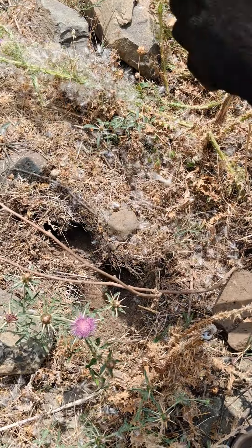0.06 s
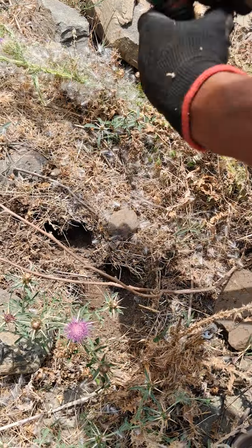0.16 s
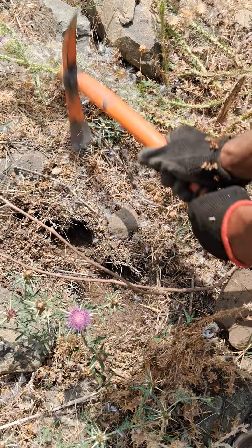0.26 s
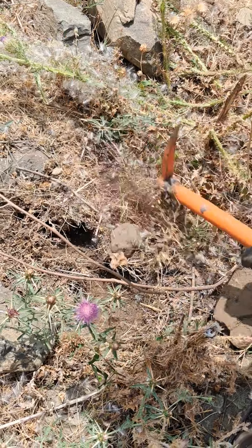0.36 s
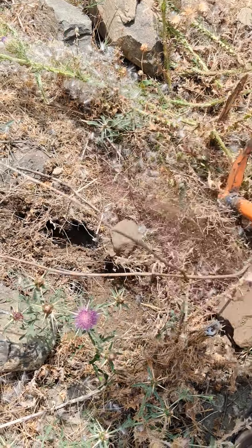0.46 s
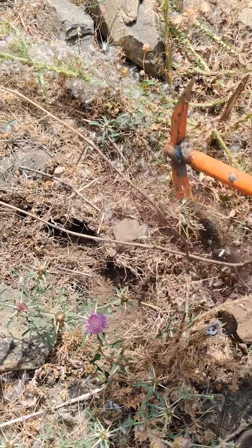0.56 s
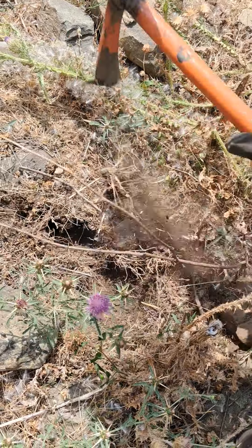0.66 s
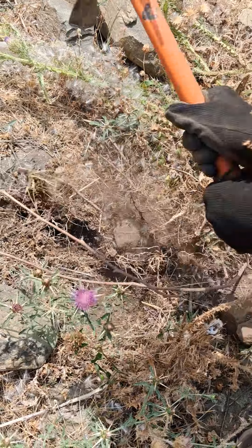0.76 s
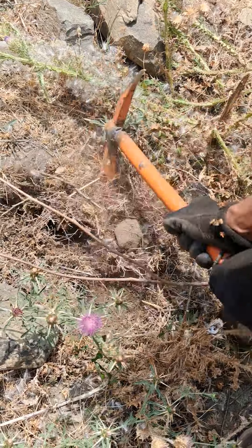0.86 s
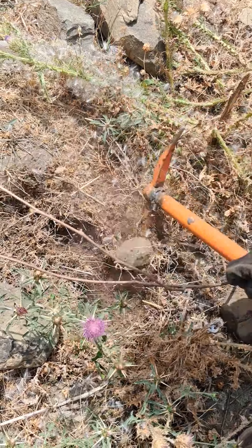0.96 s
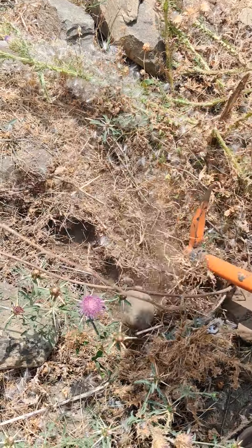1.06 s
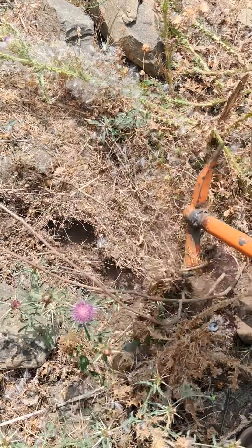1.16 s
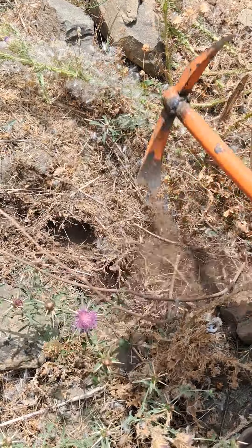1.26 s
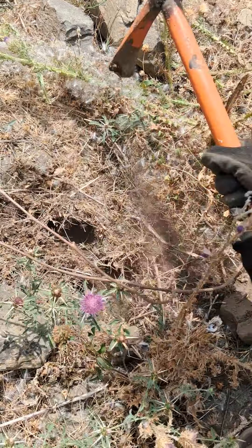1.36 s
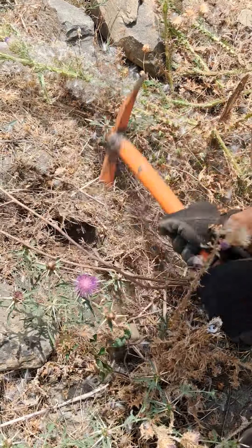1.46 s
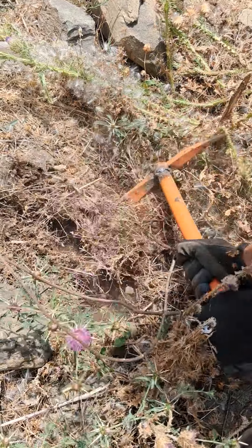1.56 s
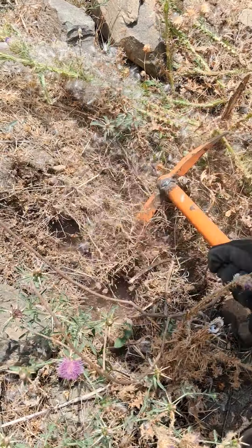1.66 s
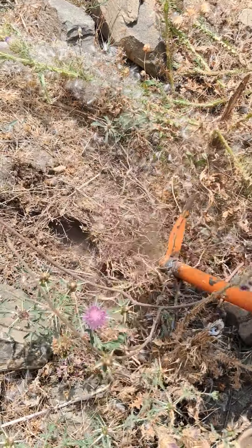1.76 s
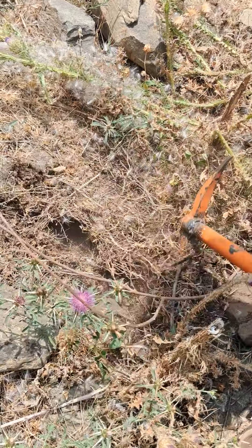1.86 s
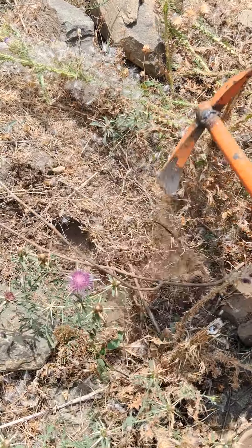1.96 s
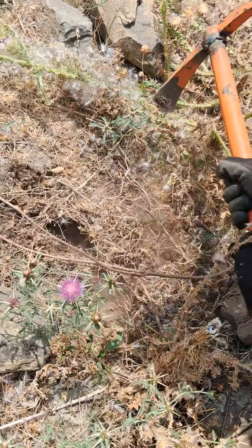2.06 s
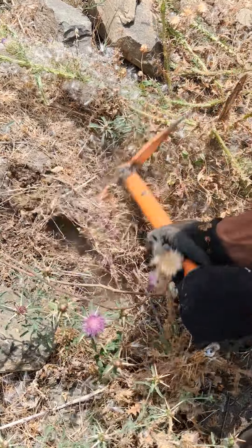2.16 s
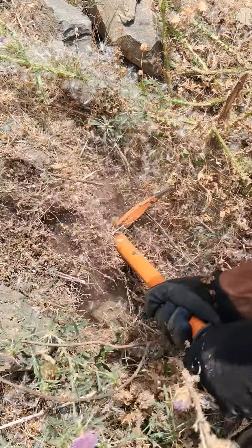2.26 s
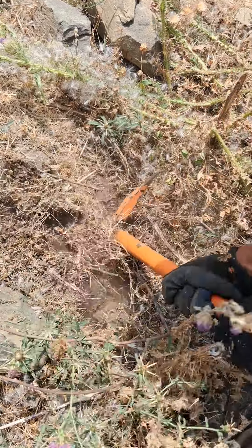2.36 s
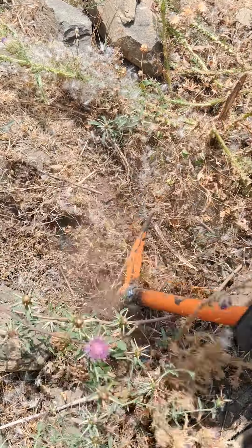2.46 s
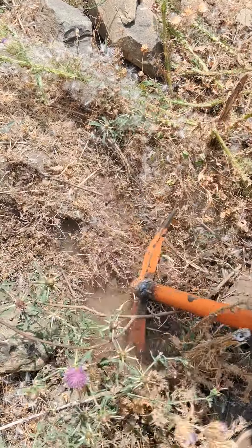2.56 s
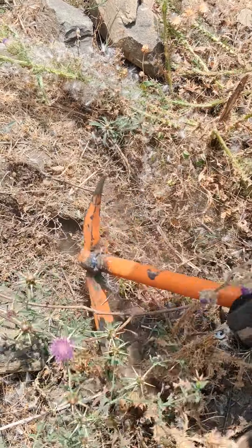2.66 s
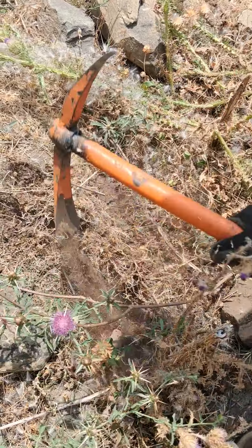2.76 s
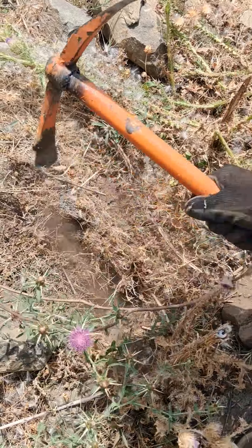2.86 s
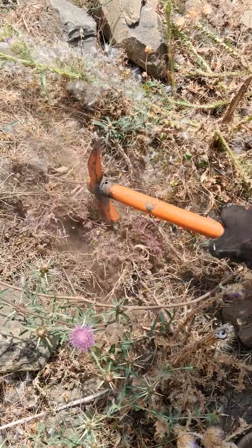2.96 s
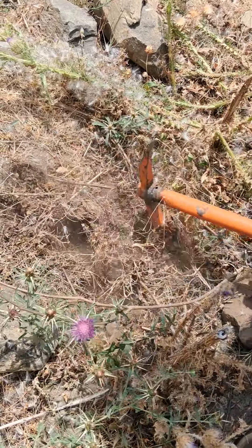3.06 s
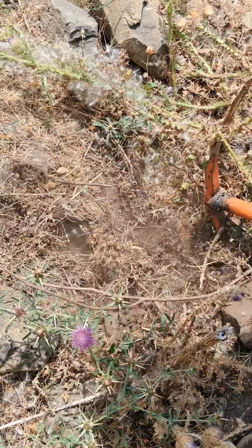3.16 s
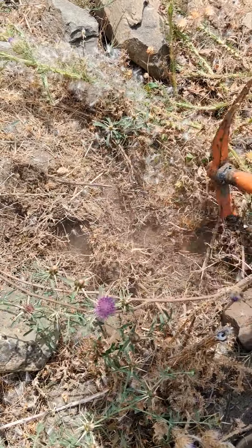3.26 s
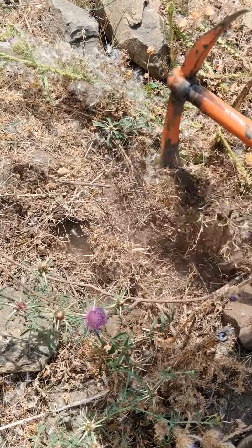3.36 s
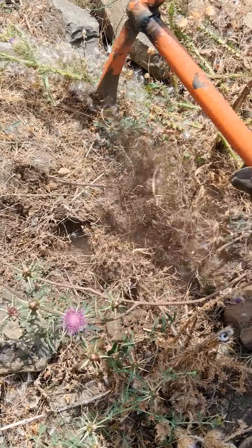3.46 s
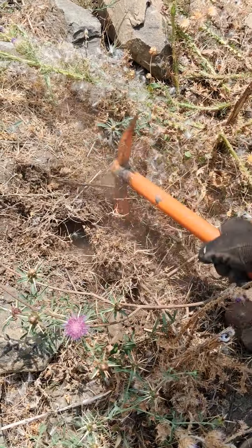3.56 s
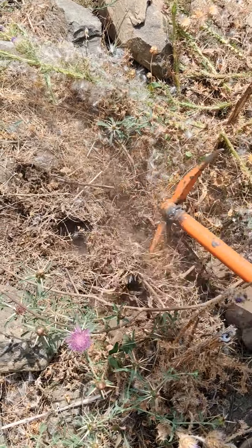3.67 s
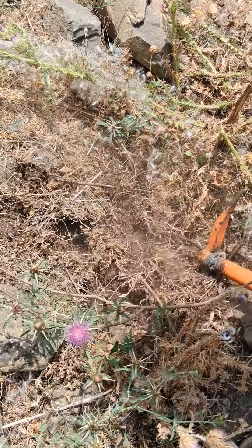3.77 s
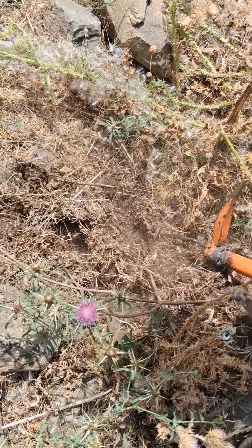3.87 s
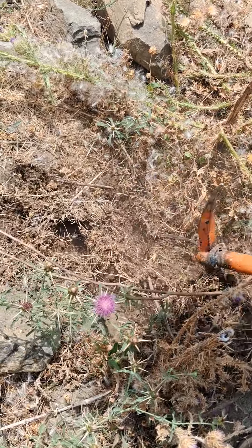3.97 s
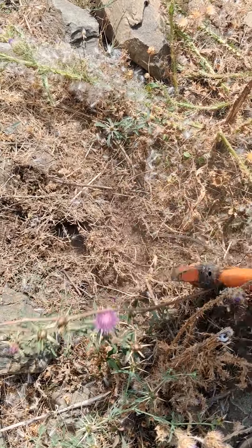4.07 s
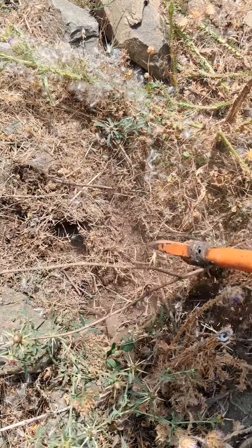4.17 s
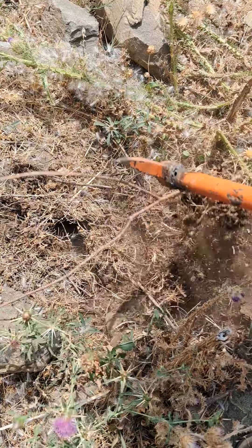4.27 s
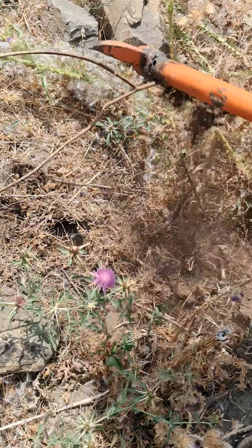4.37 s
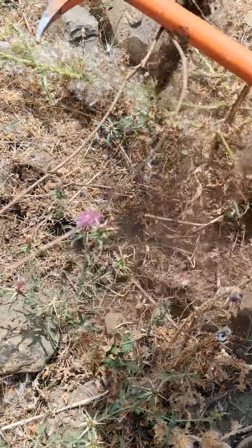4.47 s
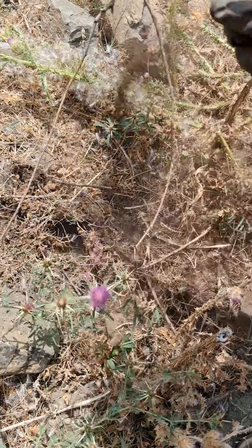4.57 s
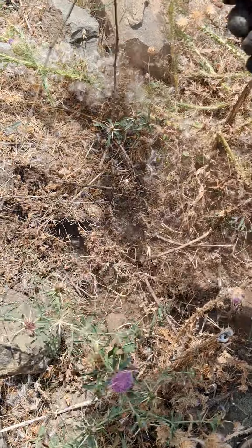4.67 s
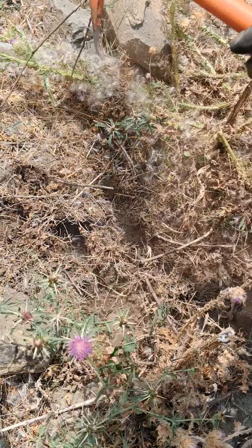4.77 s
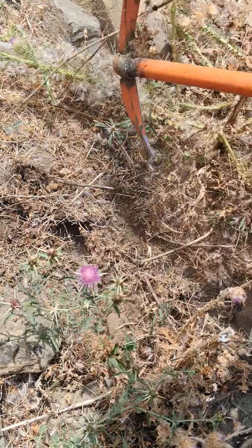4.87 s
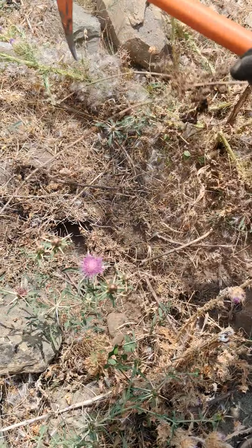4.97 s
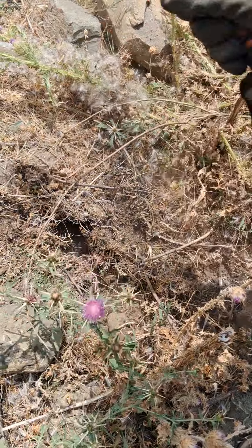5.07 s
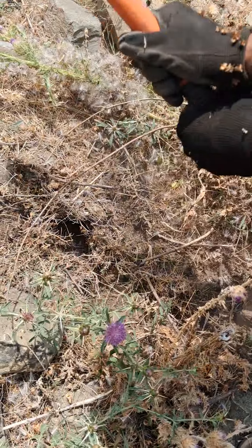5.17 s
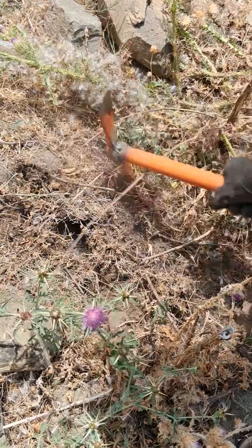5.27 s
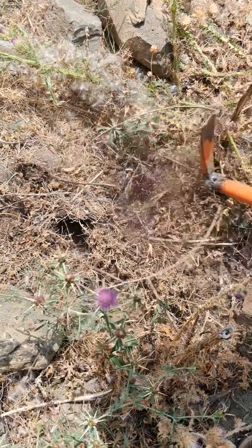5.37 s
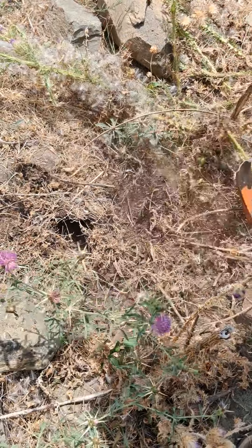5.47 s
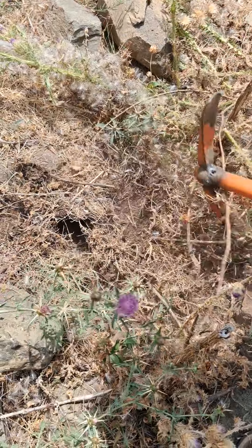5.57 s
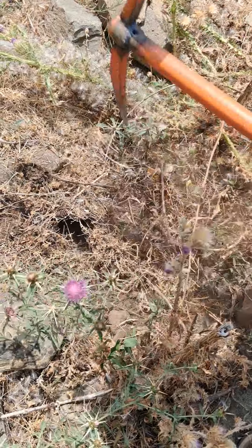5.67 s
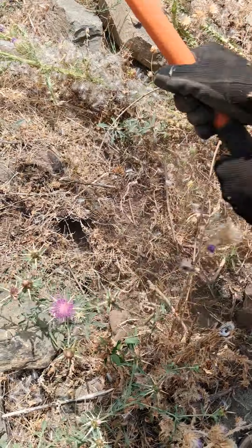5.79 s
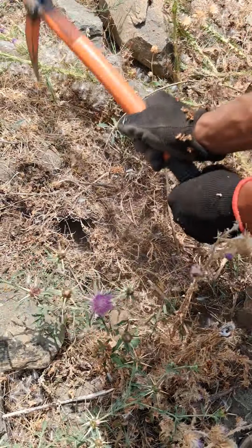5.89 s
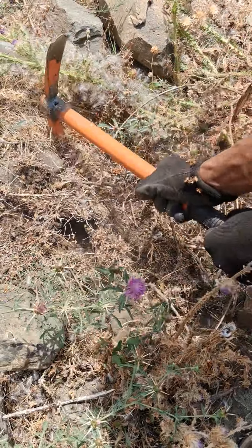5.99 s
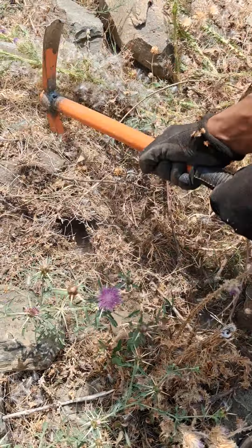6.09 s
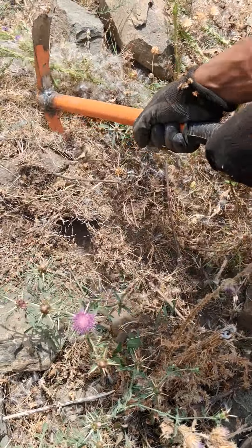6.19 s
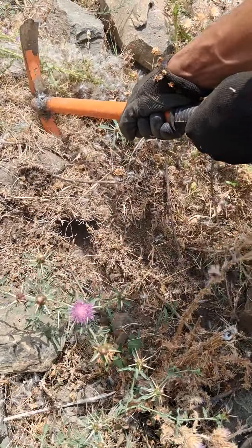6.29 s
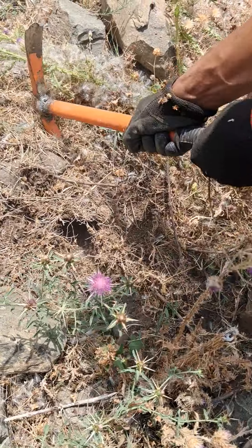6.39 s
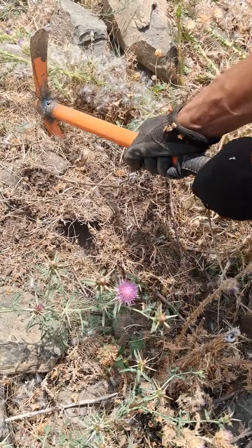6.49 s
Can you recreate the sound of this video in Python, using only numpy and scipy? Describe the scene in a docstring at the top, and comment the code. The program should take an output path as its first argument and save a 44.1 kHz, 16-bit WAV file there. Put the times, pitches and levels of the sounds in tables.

```python
"""A small pick-mattock chops eight times into dry stony soil, outdoors, close to a hand-held microphone.
Each blow is a run of tiny grit fractures ringing the struck stone, plus a low thump of the ground.
Stones, clods, stems on steel and dull handling taps knock briefly; scraped steel rings as fading sine waves.
Dry weeds snap and rustle, thrown soil patters down and grit hisses, all built from random grains.
Shaped noise and wobbling low tones make the air that buffets the microphone."""
import sys
import numpy as np
from scipy import signal
from scipy.fft import rfft, irfft
from scipy.io import wavfile

SR = 44100
rng = np.random.default_rng(int(sys.argv[2]) if len(sys.argv) > 2 else 0)


def waveform_to_disk(signal):
    """Save audio, clipped to [-1, 1], as 16-bit WAV at the path in sys.argv[1]."""
    frames = np.transpose(np.atleast_2d(signal))
    scaled = np.clip(frames, -1, 1) * 32767
    samples = np.round(scaled).astype(np.int16)
    wavfile.write(sys.argv[1], SR, samples)


N = 288049  # length of the scene in samples

# Blows of the blade. Columns: start_s, bite_s (time in the soil), left_minus_right_db (halved in use),
# four resonances of the struck stone and soil: ring1_hz, ring2_hz, ring3_hz, ring4_hz,
# body_db, knock_db, crunch_db, grit_db, fizz_db, steel_ring_db (lifted in use), thump_db, thump_hz
BLOWS = [(0.345, 0.0061, -4, 509, 1220, 2100, 3670, -26.5, -27, -13.5, -20, -20.5, -57.5, -16, 121.4),
         (0.9073, 0.0058, -2.5, 568, 1096, 2060, 2680, -28.5, -26.5, -20, -27, -26.5, -41.5, -17, 122),
         (1.53, 0.0045, -3, 539, 1190, 2210, 5100, -21.5, -15, -18.5, -19, -25, -72, -15, 190),
         (2.224, 0.0043, -2, 560, 1190, 1710, 3850, -24.5, -22, -18, -20.5, -15, -38.5, -25.5, 161.7),
         (3.0064, 0.0066, 0, 257, 1170, 2780, 3040, -30, -39.5, -29, -33.5, -29.5, -45.5, -18.5, 112.3),
         (3.6438, 0.00268, -0.5, 266.4, 1057, 2410, 4640, -28.5, -23, -15, -22, -22.5, -30, -16.5, 124),
         (5.318, 0.0073, -1, 456.5, 1374, 1920, 2860, -24.5, -19.5, -21.5, -23, -20, -42, -17, 115.7),
         (5.9923, 0.0045, -1, 274, 333, 2860, 2840, -26, -38, -24.5, -32.5, -29, -51, -29.5, 105)]
STONE_RING, STONE_SHARPNESS = 3.2, 17  # how strongly and how sharply the struck stone rings (plain numbers)


def strikes():
    """The blade brushes the weeds, crushes grit until it stops, and the ground rebounds with a thump."""
    out = np.zeros((2, N))
    lead_s = .01  # the brush through the weeds begins before contact
    t = np.arange(SR // 6) / SR - lead_s
    since = np.maximum(t, 0)
    for s, bite_s, balance_db, *colour, ring_db, thump_db, thump_hz in BLOWS:
        rings, band_db = colour[:4], colour[4:]
        crush = np.exp(-(since / (1.7 * bite_s)) ** 3) + .16 * np.exp(-since / .012)
        onset = 1 - .7 * np.exp(-since / .0007)
        entry = .11 * np.exp(-abs(t) / .0035)
        force = np.where(t > 0, crush * onset, entry)
        blow = crunch(force, balance_db / 2, band_db, per_s=9000, spread_db=4, push=.3,
                      rings=rings, ring_gain=STONE_RING, sharpness=STONE_SHARPNESS)
        add(out, s - lead_s, blow)
        add(out, s, amp(ring_db + 4.5) * steel())

        swell = since / 0.004
        rebound = swell * np.exp(1 - swell) + 0.13 * np.exp(-since / 0.033)
        phase = 2 * np.pi * thump_hz * since
        overtone = 0.36 * rebound * np.sin(2 * phase)  # packed soil stiffens, adding an overtone
        thump = rebound * (np.sin(phase) + overtone)
        add(out, s - lead_s + .005, amp(thump_db) * thump)
    return out


# Ways the steel head vibrates. Columns: pitch_hz, level_db, fade_s (time to fall 60 dB)
STEEL_MODES = [(1107, 0, .13), (1739, -15, .08), (2207, -12, .06), (2546, -3, .035), (2905, -3, .05),
               (3490, -18, .04), (4452, -27, .08), (8247, -30, .05)]


def steel():
    """The head's ring after one tap; the point of contact shifts the weight of each mode."""
    t = np.arange(SR // 4) / SR
    ring = np.zeros(len(t))
    for hz, db, fade_s in STEEL_MODES:
        fading = amp(db + rng.normal(0, 1.7) - 60 * t / fade_s)
        ring += fading * np.sin(2 * np.pi * hz * t)
    return burst_unit(ring)


# Limits of the body, knock, crunch, grit and fizz bands. Column: edge_hz
BAND_LIMITS = [175, 700, 1500, 3200, 7500, 16000]


def crunch(force, balance_db, band_db, per_s, spread_db, push=0.13, rings=(), ring_gain=1, sharpness=8):
    """A first push and a run of fractures under a force pulse ring what they hit.

    band_db sets the levels of the topmost bands; balance_db is left minus right.
    """
    x = burst_unit(pair(grains(len(force), per_s, spread_db)) * force)
    x[:, np.argmax(force)] += push * np.sqrt(SR / 100)
    x = x + ring_gain * sum(resonate(x, hz, 60 + hz / sharpness) for hz in rings)
    bands = list(zip(BAND_LIMITS, BAND_LIMITS[1:]))[-len(band_db):]
    out = np.zeros_like(x)
    for band, db in zip(bands, band_db):
        band_filter = signal.butter(N=4, Wn=band, btype="band", fs=SR, output="sos")
        out += amp(db) * burst_unit(signal.sosfilt(band_filter, x))
    return out * amp([[balance_db / 2], [-balance_db / 2]])


# Short knocks: stones, clods, stems breaking against the steel, and dull handling taps near the microphone.
# Columns: start_s, length_s, resonance_hz, left_minus_right_db (halved in use),
# level_db (in the band of the resonance), bass_step_db (per band below), treble_step_db (per band above),
# steel_ring_db (lifted in use)
SHORT_KNOCKS = [(0.027, 0.00057, 1390, 8, -27.5, -11, -14.5, -62),
                (0.047, 0.00068, 1290, 4, -45, 6.5, -13, -62),
                (0.085, 0.00045, 1180, 5, -45, -2.5, -12, -60),
                (0.178, 0.0068, 1130, 9.5, -42, -3, -17, -59.5), (0.4382, 0.004, 2120, 0, -34, -5, -9, -68),
                (0.51, 0.0058, 2260, -6.5, -40.5, -8.5, -1.5, -69),
                (1.0289, 0.005, 1990, 1, -25.5, 1, -7, -30.5),
                (1.0784, 0.0081, 3900, -1, -29, -7.5, -9, -68),
                (1.6587, 0.0013, 1880, 0.5, -40.5, -13.5, -4, -66),
                (1.718, 0.0043, 1770, 2, -36.5, -8.5, -5, -68),
                (1.771, 0.0026, 2130, 4.5, -37.5, -4.5, -9, -54.5),
                (1.783, 0.0089, 1820, -7, -38.5, -4, -0.5, -58.5),
                (2.406, 0.004, 2304, -4.5, -42.5, -3, -11, -60),
                (2.443, 0.0049, 2500, -5, -36, -2, -16, -40.5),
                (2.527, 0.0089, 1830, -10, -38.5, -3, -12, -50),
                (2.6777, 0.0038, 1810, -3, -46, 3.5, 2, -60), (3.0335, 0.0032, 1030, -7, -36.5, 2, -2, -63),
                (3.0793, 0.0025, 1990, -2, -37.5, -5.5, -3, -64),
                (3.157, 0.0036, 2100, 0, -32.5, -6.5, -4.5, -56),
                (3.165, 0.0038, 2070, -3, -19.5, -14, -10.5, -44),
                (3.7004, 0.0039, 1140, -3.5, -27, -1.5, -6, -39.5),
                (3.743, 0.0038, 2260, 1, -24.5, -20, -3.5, -60),
                (3.7605, 0.0075, 3480, -6, -32.5, 1, -16, -33.5),
                (3.831, 0.0014, 2550, -2, -43, -5.5, -1, -63),
                (3.9904, 0.011, 1680, 1, -36.5, -9, -18, -55),
                (4.0098, 0.003, 1670, -5, -28, -16, -13, -36.5),
                (4.055, 0.0017, 2570, -11, -36, -11.5, -15, -62),
                (4.0775, 0.0039, 2960, -10, -34, -16, -9, -30.5),
                (5.3447, 0.0024, 2850, -7, -35, -2, -5.5, -44.5),
                (5.366, 0.006, 2880, -4, -29, -4.5, -4, -59),
                (5.4114, 0.0026, 1760, -3, -48.5, 4.5, -12, -63)]
KNOCK_RING, KNOCK_SHARPNESS = 5, 19  # how strongly and how sharply a knock rings (plain numbers)
THUD_DB, THUD_HZ, THUD_S = -12, 114, 0.013  # thud: level against the body band, pitch, swell's time to peak


def knocks():
    """Short contacts of stone, stem or hand ring what they touch; more body brings more of a low thud."""
    out = np.zeros((2, N))
    t = np.arange(SR // 10) / SR
    thud = t / THUD_S * np.exp(1 - t / THUD_S) * np.sin(2 * np.pi * THUD_HZ * t)
    for s, length_s, hz, balance_db, db, bass_db, treble_db, ring_db in SHORT_KNOCKS:
        steps = np.arange(len(BAND_LIMITS) - 1) - np.searchsorted(BAND_LIMITS[1:], hz)  # bands from resonance
        band_db = db + abs(steps) * np.where(steps < 0, bass_db, treble_db)
        force = np.exp(-t / (1.2 * length_s)) + .04 * np.exp(-t / .014)
        knock = crunch(force, balance_db / 2, band_db, per_s=8000, spread_db=1.5, push=0.23,
                       rings=[hz], ring_gain=KNOCK_RING, sharpness=KNOCK_SHARPNESS)
        add(out, s, knock)
        add(out, s, amp(ring_db + 1) * steel())
        add(out, s, amp(band_db[0] + THUD_DB) * thud)
    return out


# The blade dragged over stone. Columns: start_s, end_s, level_db, brightness_db (per octave),
# steel_ring_db (lowered in use)
STONE_SCRAPES = [(2.387, 2.445, -47.5, -4, -52.5), (3.707, 3.766, -25.5, -2, -56),
                 (3.767, 3.812, -35, -2.5, -55), (3.99, 4.096, -38.5, -0.5, -39),
                 (5.341, 5.379, -26.5, -2, -50)]
# Tone of the scraping. Columns: pitch_hz, level_db
SCRAPE_TONE = [(88, -47.5), (150, -6.5), (457, -10.5), (545, -29.5), (675, 6.5), (923, -6), (1100, -8.5),
               (1290, -0.5), (2180, 3.5), (6390, -1), (7770, -10), (11700, -2.5), (16000, -39)]


def scrapes():
    """The steel sticks and slips over stone; every slip sheds grit and taps the head."""
    out = np.zeros((2, N))
    t = np.arange(SR // 50) / SR
    for start, end, db, tilt_db, ring_db in STONE_SCRAPES:
        count = round(max(end - start, .02) * SR)
        sticking = abs(grains(count, per_s=420, spread_db=3)[0])
        slips = signal.fftconvolve(sticking, np.exp(-t / 0.0021))[:count]
        stroke = signal.windows.tukey(count, .5)
        grit = grains(count, per_s=9000, spread_db=2.5) * (.35 + unit(slips))
        rub = pair(grit, SCRAPE_TONE, tilt_db) * stroke
        add(out, start, amp(db) * rub)
        ring = unit(signal.fftconvolve(rub, steel()[None], axes=1))
        add(out, start, amp(ring_db - 3) * ring)
    return out


# Dry stems breaking. Columns: start_s, length_s, left_minus_right_db (quartered in use), fizz_db,
# bass_step_db (per band below the fizz)
STEM_SNAPS = [(0.218, 0.0094, 4, -41, -6.5), (0.544, 0.0038, -3, -38, -17), (0.906, 0.0047, 3, -54.5, 12.5),
              (1.204, 0.0052, -21, -35, -30), (2.5252, 0.0046, -19, -21.5, -7),
              (2.553, 0.00086, -12, -21.5, -15), (2.676, 0.00091, -22, -24, -6.5),
              (2.986, 0.012, -13, -42.5, -4), (4.113, 0.0013, -7, -36.5, -7),
              (4.2947, 0.0012, -10, -43.5, -24), (4.6875, 0.011, -11, -45.5, -5.5),
              (5.3096, 0.0092, -6, -31.5, -11), (5.415, 0.001, -16, -28, -32),
              (5.482, 0.0028, -20, -31, -8.5), (6.267, 0.0044, -2, -52.5, -5.5),
              (6.465, 0.0043, 9.5, -54, -17.5)]


def snaps():
    """Brittle stems give way in a quick run of bright cracks."""
    out = np.zeros((2, N))
    t = np.arange(SR // 20) / SR
    for s, length_s, balance_db, db, bass_db in STEM_SNAPS:
        decay = np.exp(-t / length_s) + .025 * np.exp(-t / .008)
        force = (1 - np.exp(-t / .0006)) * decay
        band_db = [db + 2 * bass_db, db + bass_db, db]  # crunch, grit, fizz
        add(out, s, crunch(force, balance_db / 4, band_db, per_s=11000, spread_db=0.5))
    return out


# Showers of thrown soil landing. Columns: middle_s, half_length_s, level_db
SOIL_SHOWERS = [(0.45, 0.054, -43), (0.602, 0.011, -51), (1.035, 0.081, -40), (1.235, 0.022, -57),
                (1.72, 0.15, -48.5), (1.939, 0.018, -54), (2.25, 0.063, -45.5), (3.159, 0.082, -43.5),
                (3.83, 0.052, -49), (4.443, 0.0099, -45.5), (4.521, .012, -51), (5.1, 0.0073, -60.5),
                (5.41, 0.025, -60), (6.147, 0.015, -58.5)]
# Tone of the falling soil. Columns: pitch_hz, level_db
SOIL_TONE = [(250, -14), (700, -11), (1100, -14), (1400, -16), (1750, -3), (2150, -5.5), (2500, -8.5),
             (2950, -5), (4000, -17), (5200, -9.5), (7000, -18), (12000, -26)]
# Tone of the rustling weeds. Columns: pitch_hz, level_db
WEED_TONE = [(400, -16.5), (1500, -11), (3000, -13.5), (5000, -9.5), (6500, -12), (8500, -9), (10000, -6),
             (11700, 0), (13300, -3), (15500, -6)]
# Tone of the ticking twigs. Columns: pitch_hz, level_db
TICK_TONE = [(300, -22.5), (1200, -10), (1900, -5), (3200, -8.5), (5000, -2.5), (7000, -7.5), (9000, -13),
             (15000, 3.5)]


def debris():
    """Crumbs of soil patter down in showers; dry weeds crackle in flurries, and now and then a twig ticks."""
    crumbs = clumps(per_s=360, length_s=0.0036, spread_db=3.5)
    soil = pair(grains(N, per_s=9000, spread_db=2) * (.4 + crumbs), SOIL_TONE)
    falling = sum(amp(db) * bump(middle, half) for middle, half, db in SOIL_SHOWERS)

    stems = clumps(per_s=300, length_s=.0025, spread_db=3.8)
    fibres = grains(N, per_s=22000, spread_db=1.5) * (.75 + stems)
    weeds = pair(fibres, WEED_TONE, share=0.1)

    twigs = clumps(per_s=35, length_s=.0009, spread_db=2.5)
    ticks = pair(rng.standard_normal((2, N)) * twigs, TICK_TONE)

    shaking = rustle()
    stirring = np.sqrt(shaking)  # twigs keep settling after the rustle has faded
    pattering = soil * (falling + amp(-15.5) * shaking)
    return pattering + amp(3.0) * weeds * shaking + amp(-33) * ticks * stirring


# The blade drags through dry weeds. Columns: start_s, crest_s,
# crest_db (relative; the weeds and soil have their own gains), settling_db_per_s
WEED_DRAGS = [(0.368, 0.454, -35, 80), (0.923, 1.105, -40, 83), (1.535, 1.785, -44, 59),
              (2.25, 2.618, -39.5, 56), (3.014, 3.229, -39.5, 50), (3.623, 3.78, -40.5, 25),
              (4.088, 4.396, -42, 27), (5.34, 5.486, -32, 95), (6.101, 6.194, -49.5, 88)]
# The swinging tool brushes past stems. Columns: middle_s, half_length_s, level_db (relative, as above)
STEM_BRUSHES = [(.14, 0.18, -51), (1.031, 0.016, -36.5), (1.208, 0.033, -42), (1.47, 0.11, -52),
                (1.62, 0.046, -44), (2.239, 0.045, -33.5), (2.341, 0.019, -39.5), (2.538, 0.019, -30),
                (2.7, 0.043, -38), (5.088, 0.033, -41.5), (5.345, .015, -38), (6.007, 0.023, -48),
                (6.305, .025, -48.5)]
DRAG_ONSET_S, DRAG_SWELL_DB = 0.0087, 8.5  # every drag sets in quickly and swells to its crest
STIR_DB = -71.5  # the weeds never quite rest (relative, as above)


def rustle():
    """How hard the weeds shake: each drag swells to a crest and settles, each brush is a short swish."""
    t = np.arange(N) / SR
    power = amp(STIR_DB) ** 2
    for start, crest, db, settle_db_per_s in WEED_DRAGS:
        swell_db = np.interp(t, [start, crest], [-DRAG_SWELL_DB, 0])
        shape_db = swell_db - settle_db_per_s * np.maximum(t - crest, 0)
        onset = np.clip((t - start) / DRAG_ONSET_S, 0, 1)
        power = power + (onset * amp(db + shape_db)) ** 2
    for middle, half, db in STEM_BRUSHES:
        power = power + (amp(db) * bump(middle, half)) ** 2
    return np.sqrt(power)


def clumps(per_s, length_s, spread_db):
    """A restless level: each crumb or stem sets off a brief flurry that dies away."""
    starts = grains(N, per_s, spread_db)[0] ** 2
    power = signal.lfilter([1], [1, -np.exp(-2 / (length_s * SR))], starts)
    return unit(np.sqrt(power))


# Thin hiss of the blade sliding out. Columns: time_s, level_db
SLIDE_LEVEL = [(2.54, -90), (2.62, -48.5), (2.70, -45), (2.78, -53), (2.92, -66.5)]


def slide():
    """Fine grit hisses along the blade as it is drawn out."""
    grit = pair(grains(N, per_s=6300, spread_db=4.5))
    hiss = unit(resonate(grit, hz=2740, width_hz=600))
    hiss = unit(resonate(hiss, hz=2560, width_hz=1000))
    t = np.arange(N) / SR
    sliding = (t > SLIDE_LEVEL[0][0]) * (t < SLIDE_LEVEL[-1][0])
    return hiss * level(SLIDE_LEVEL) * sliding


def ground_echo(x):
    """Rocks and scrub scatter a short faint tail."""
    t = np.arange(SR // 4) / SR
    fading = amp(-60 * t / 0.13) * (t > .006)
    taps = grains(len(t), per_s=1900, spread_db=-0.5) * fading
    return signal.fftconvolve(x, pair(taps) / np.sqrt(len(t)), axes=1)[:, :N]


# Strength of the air moving past the microphone. Columns: time_s, level_db
BUFFET_LEVEL = [(0, -53), (.28, -61.5), (.45, -43), (.6, -63), (1.05, -49), (1.3, -57.5), (1.65, -46.5),
                (2.17, -50.5), (2.27, -34.5), (2.72, -37.5), (3.3, -46.5), (3.4, -53), (4.45, -48.5),
                (4.82, -55), (5.2, -50.5), (5.6, -71), (6.25, -66.5), (6.53, -75)]
# Tone of the buffeting. Columns: pitch_hz, level_db
BUFFET_TONE = [(12, -52), (20, -22), (51, -3), (75, -1), (139, -7.5), (184, -20), (303, -21), (392, -28.5),
               (600, -32), (780, -46), (1320, -120)]
# Single puffs of air from the swing. Columns: middle_s, half_length_s, level_db (lifted in use), pitch_hz
AIR_PUFFS = [(0.699, 0.038, -47.5, 82.5), (2.374, 0.02, -42.5, 65.5), (2.601, 0.0098, -29.5, 96.3),
             (2.72, 0.032, -34.5, 75.4), (2.797, 0.0086, -43.5, 101.6), (2.881, 0.017, -33.5, 81),
             (3.23, 0.056, -38.5, 60), (3.464, 0.022, -40.5, 60.4), (4.124, 0.02, -41.5, 80.8),
             (4.924, 0.014, -45, 85), (5.088, 0.021, -37, 69.9), (5.166, 0.047, -43, 78.9)]
# Tone of the open country's hush. Columns: pitch_hz, level_db
HUSH_TONE = [(24, -25), (40, -1.5), (91, 2), (320, -5), (697, -6), (1370, -9), (2700, -14.5), (8550, -19.5),
             (12500, -13), (16000, -14.5)]
HUSH_DB = -58.5


def air():
    """Low buffeting and single puffs at the ports, over the faint hush of open country."""
    buffet = pair(rng.standard_normal((2, N)), BUFFET_TONE, share=.65) * level(BUFFET_LEVEL)
    t = np.arange(N) / SR
    for middle, half, db, hz in AIR_PUFFS:
        # an eddy reaches the two ports out of step, and its rate wanders
        wander = np.interp(t, t[::400], rng.standard_normal(len(t[::400])))
        out_of_step = rng.normal(0, .45, (2, 1))
        phase = 2 * np.pi * (hz * t + rng.random()) + .8 * wander + out_of_step
        buffet = buffet + amp(db + 5) * bump(middle, half) * np.sin(phase)
    hush = pair(rng.standard_normal((2, N)), HUSH_TONE, share=0.16)
    return buffet + amp(HUSH_DB) * hush


def grains(count, per_s, spread_db):
    """Two trains of tiny fractures at random times; a positive spread makes many small and a few large."""
    size = amp(spread_db * np.minimum(rng.exponential(1, (2, count)), 4))
    sign = rng.choice([-1, 1], (2, count))
    happens = rng.random((2, count)) < per_s / SR
    return unit(size * sign * happens)


# How alike the two ports hear each pitch. Columns: pitch_hz, likeness (0 unrelated, 1 the same)
PORT_LIKENESS = [(50, 1), (150, 1), (1000, 0.84), (2200, 0.94), (3500, 0.24), (5000, 0.96), (8000, 0.7),
                 (16000, 0.092)]


def pair(x, colour=((1, 0), (2, 0)), tilt_db=0, share=1):
    """Colours two unrelated signals and makes them partly alike, most in the bass, as at two close ports."""
    hz = np.fft.rfftfreq(x.shape[1], 1 / SR)
    a, b = rfft(x)
    same = np.clip(share * read(PORT_LIKENESS, hz), -1, 1)
    gain = amp(read(colour, hz) + tilt_db * np.log2(hz + 1))
    second = same * a + np.sqrt(1 - same ** 2) * b
    return unit(irfft(gain * np.array([a, second]), x.shape[1]))


def resonate(x, hz, width_hz):
    """One resonance of gain 1 at its peak."""
    return signal.lfilter(*signal.iirpeak(min(hz, SR / 2 - 1), hz / width_hz, fs=SR), x)


def bump(middle, half):
    """A bell-shaped swell of height 1."""
    return np.exp(-np.minimum(((np.arange(N) / SR - middle) / half) ** 2, 60))


def level(curve):
    """A dB curve as a gain for every sample."""
    s, db = np.transpose(curve)
    return amp(np.interp(np.arange(N) / SR, s, db))


def read(points, hz):
    """Reads a spectrum on a log-frequency axis."""
    f, value = np.transpose(points)
    return np.interp(np.log(hz + 1), np.log(f + 1), value)


def amp(db):
    """Decibels to gain."""
    return 10 ** (np.asarray(db) / 20)


def unit(x):
    """Scales to rms 1."""
    return x / np.sqrt(np.mean(x ** 2) + 1e-20)


def burst_unit(x):
    """Scales a short sound to the energy of 10 ms at rms 1."""
    return unit(x) * np.sqrt(SR / 100 / x.shape[-1])


def add(mix, s, sound):
    """Mixes a sound in at time s."""
    part = mix[:, max(round(s * SR), 0):][:, :sound.shape[-1]]
    part += sound[..., :part.shape[1]]


def scene():
    """The digging with its handling taps, its scatter and the open air."""
    hits = strikes() + knocks() + snaps() + scrapes()
    return hits + amp(-20) * ground_echo(hits) + debris() + slide() + air()


# Level difference between the two ports. Columns: pitch_hz, left_minus_right_db
PORT_BALANCE = [(100, 1), (600, 2.5), (1500, 0.5), (2800, -2), (4500, -1.5), (6000, -1), (7600, 3.5),
                (9000, 0.5), (10500, -9), (11600, -8.5), (13200, -11), (15500, -1.5)]
# Phase of the left port ahead of the right (negative is behind). Columns: pitch_hz, lead_radians
PORT_LEAD = [(100, -1), (1700, 1), (2800, 1), (4000, 0.93), (6000, 2), (9000, 3.5), (16000, -4)]
# Dips, and one slight lift, in the microphone's response. Columns: pitch_hz, level_db
MICROPHONE_TONE = [(620, -0.5), (780, -2.5), (950, -1), (1150, -0.5), (1400, -5.5), (1700, -0.5),
                   (4500, 1.5), (7000, -1), (8500, -5.5), (10200, -1)]


def record(dry):
    """Two ports differ in level and phase; deep bass is cut, large peaks round off, the top is band-limited."""
    hz = np.fft.rfftfreq(N, 1 / SR)
    ratio = amp(read(PORT_BALANCE, hz))
    left = ratio * np.exp(1j * read(PORT_LEAD, hz))
    right = np.ones_like(ratio)
    ports = np.array([left, right]) / np.sqrt((1 + ratio ** 2) / 2)  # keeps the summed power
    heard = irfft(rfft(dry) * ports * amp(read(MICROPHONE_TONE, hz)), N)
    heard = signal.sosfilt(signal.butter(3, 42, "high", fs=SR, output="sos"), heard)
    heard = heard / (1 + heard ** 6) ** (1 / 6)
    band_limit = signal.firwin(301, 15950, window=("kaiser", 9), fs=SR)
    return signal.oaconvolve(heard, band_limit[None], "same")


dry = scene()
out = record(dry)
waveform_to_disk(out)
```